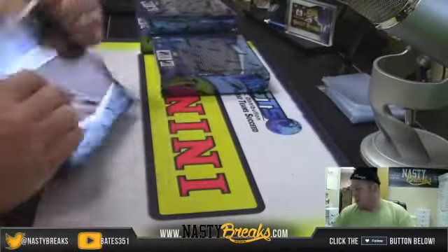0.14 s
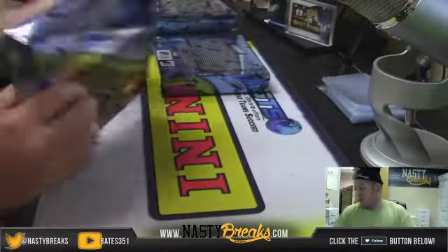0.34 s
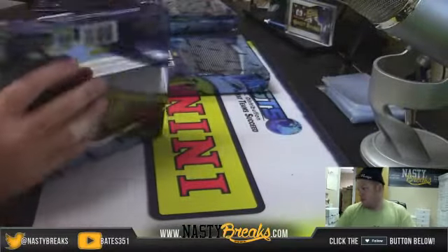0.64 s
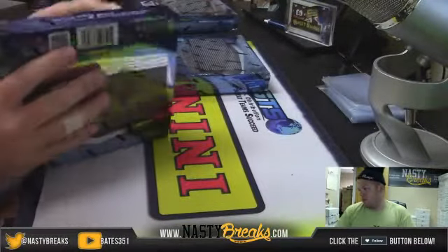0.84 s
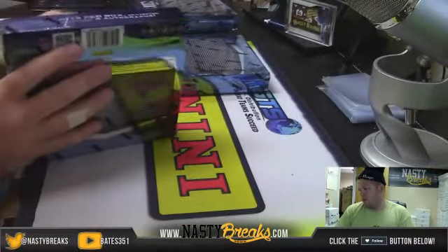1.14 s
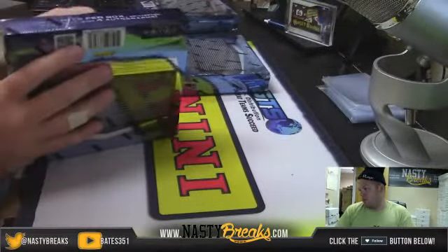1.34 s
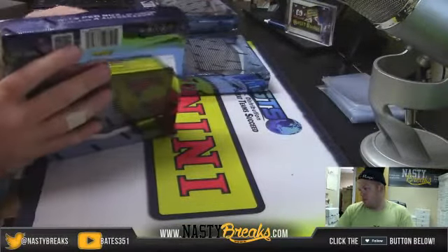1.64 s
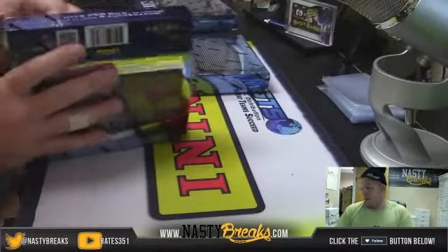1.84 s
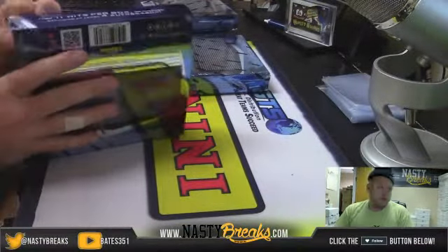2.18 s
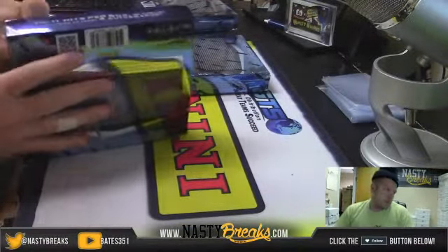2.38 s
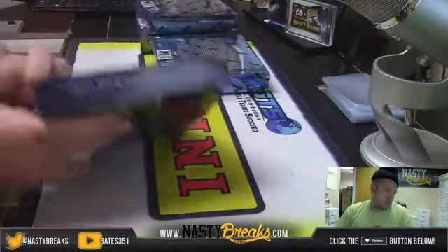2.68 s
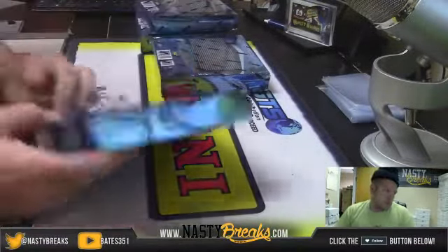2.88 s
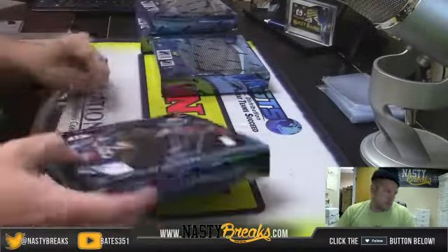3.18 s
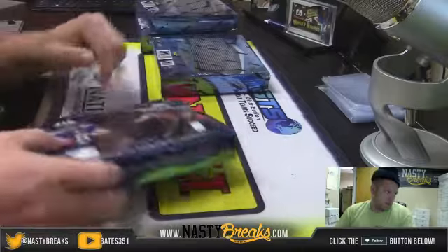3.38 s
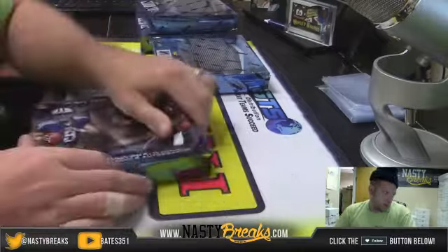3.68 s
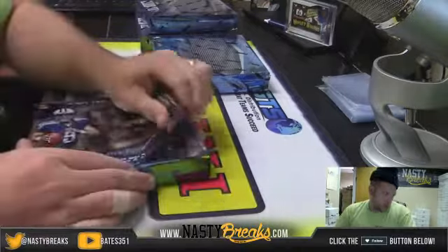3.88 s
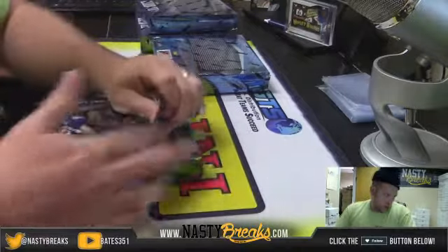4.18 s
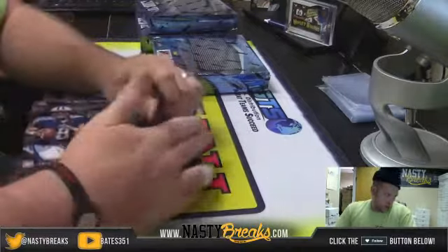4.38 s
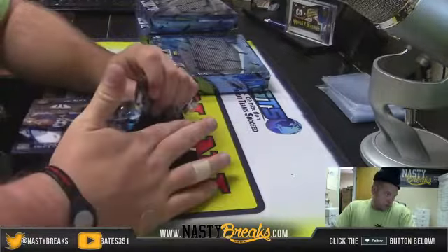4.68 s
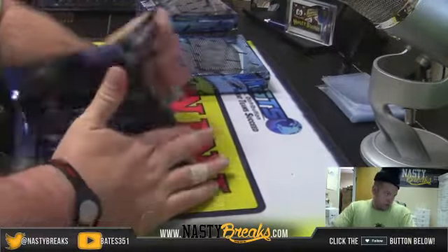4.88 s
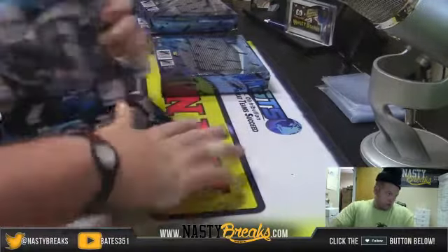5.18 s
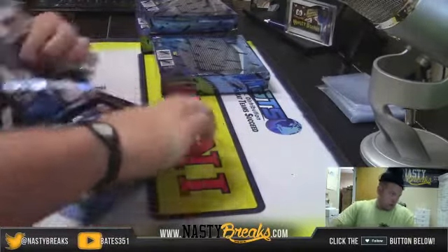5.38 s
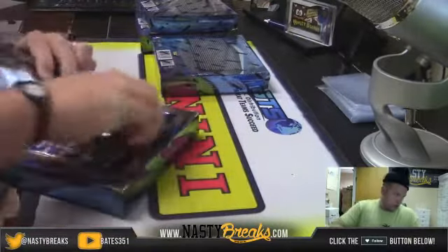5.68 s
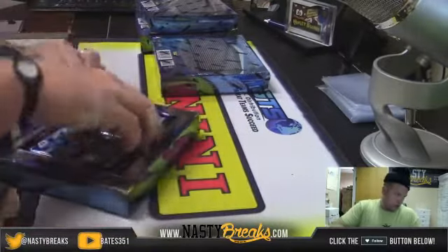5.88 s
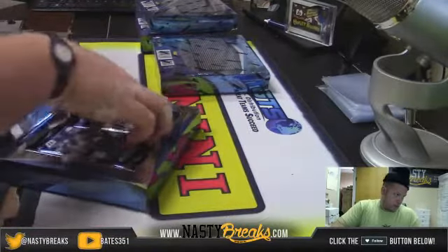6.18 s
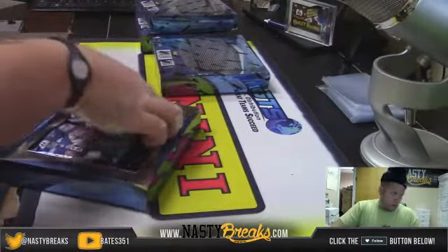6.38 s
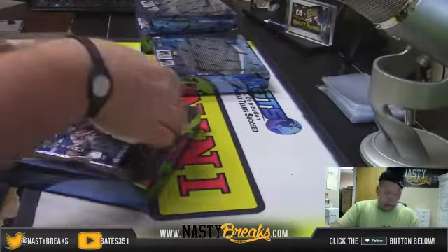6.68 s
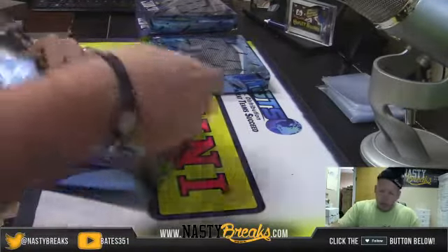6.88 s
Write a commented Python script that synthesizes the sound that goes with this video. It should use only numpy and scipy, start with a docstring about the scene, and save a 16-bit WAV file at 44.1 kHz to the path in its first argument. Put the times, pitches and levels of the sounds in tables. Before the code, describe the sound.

In a small room, hands slide and turn a film-wrapped cardboard box on a desk. Light knocks and crinkles lead to a hard thud just after two seconds, more sliding, then a very loud distorted slap near four and a half. Plastic then crackles and snaps densely to the end. The close microphone picks up desk rumble through its stand, over faint hum.

```python
"""At a desk in a small room, shrink-wrapped cardboard boxes are lifted, slid, opened and set down near a microphone.
Cardboard is made of ringing modes and shaped noise for knocks, and of random tiny slips for rubbing.
Plastic film swishes as shaped noise and crackles and snaps as short bursts with pitches of their own.
Landings ring the desk top and sway the microphone stand, over mains hum and hiss; the hardest blows clip."""
import sys
import numpy as np
from scipy import signal
from scipy.fft import rfft, irfft, next_fast_len
from scipy.io import wavfile
from scipy.ndimage import map_coordinates

SR = 44100
rng = np.random.default_rng(int(sys.argv[2]) if len(sys.argv) > 2 else 0)


def to_wav(s):
    """Save 16-bit WAV."""
    ch = np.atleast_2d(s).T  # columns
    pcm = np.round(np.clip(ch, -1, 1) * 32767)  # PCM
    wavfile.write(sys.argv[1], SR, pcm.astype(np.int16))


N = 310023  # length of the scene in samples

# The tone colour of cardboard. Each row: frequency in Hz, relative level in dB.
CARDBOARD_COLOUR = [(60, 4), (170, 6.5), (260, -1), (420, 2), (750, 0), (1000, -7), (1300, -4), (2000, -19),
                    (3500, -18), (8000, -37)]
# The tone colour of plastic film. Each row: frequency in Hz, relative level in dB.
FILM_COLOUR = [(500, -8), (1500, 8), (3300, 4.5), (5000, 2.5), (8000, 4), (10500, -2), (13000, 1.5),
               (16000, -5)]
# The tone colour of a stiff edge or sheet. Each row: frequency in Hz, relative level in dB.
EDGE_COLOUR = [(400, -11.5), (1500, 5), (3500, 2), (4800, 3), (5600, 3), (6500, 1), (8800, 5), (11000, -4),
               (13500, 2), (16000, -13)]
# The modes of the desk top. Each row: frequency in Hz, level in dB, time to fade by 60 dB in seconds.
DESK_MODES = [(65, -28, 0.18), (89, -2, 0.095), (111, 1, 0.24), (122.2, 0, 0.19), (166.5, -10, 0.17),
              (225.5, -8.5, 0.04), (293, -30.5, 0.074)]
LEAD_IN = 0.006  # seconds of quiet rise before a blow


def amp(db):
    """Turn decibels into a gain."""
    return 10 ** (np.asarray(db) / 20)


def unit(x):
    """Scale a sound to an rms of 1."""
    return x / np.sqrt(np.mean(x ** 2) + 1e-20)


def along(points, hz):
    """Read a table of (Hz, value) points at any frequency, along a logarithmic axis."""
    point_hz, value = np.transpose(points)
    return np.interp(np.log(hz + 1), np.log(point_hz + 1), value)


def curves(rows):
    """Join the rows into one curve of straight segments for each column after the time."""
    seconds, *columns = np.transpose(rows)
    return [np.interp(np.arange(N) / SR, seconds, column) for column in columns]


def wobble(rate):
    """Draw a smooth random curve through a given number of random points a second."""
    points = rng.standard_normal(int(N * rate / SR) + 4)
    return map_coordinates(points, [np.arange(N) * rate / SR])


def filtered(x, response):
    """Multiply the spectrum of a sound by a response that depends on frequency."""
    size = next_fast_len(len(x) + 8192)  # silence added so that the end does not wrap to the start
    spectrum = rfft(x, size) * response(np.fft.rfftfreq(size, 1 / SR))
    return irfft(spectrum, size)[:len(x)]


def coloured(x, colour):
    """Give a sound the tone colour in a table, at an rms of 1."""
    return unit(filtered(x, lambda hz: amp(along(colour, hz))))


def resonance(hz, centre, width):
    """The frequency response of one damped mode."""
    return 1j * hz * width / (centre ** 2 - hz ** 2 + 1j * hz * width)


def fade(t, t60):
    """A decay that loses 60 dB in t60 seconds."""
    return np.exp(-np.log(1000) * t / t60)


def struck(t, t60, lead_db):
    """The loudness of a contact: a short quiet rise, then the blow and its decay."""
    return np.where(t < LEAD_IN, amp(lead_db) * t / LEAD_IN, fade(np.abs(t - LEAD_IN), t60))


def add(track, s, sound):
    """Mix a sound into the track at s seconds."""
    start = max(round(s * SR), 0)
    track[start:start + len(sound)] += sound[:max(N - start, 0)]


def slips(rate, spread_db):
    """Stick and slip: random tiny impulses of very unequal size, about rate of them a second."""
    size = amp(spread_db * np.minimum(rng.exponential(size=N), 3))
    happens = rng.random(N) < rate / SR
    return happens * size * rng.choice([-1, 1], N)


def ringing(modes, t, hardness_db, pivot_hz, scatter_db):
    """Damped modes struck at new strengths each time; a harder contact favours the higher ones."""
    total = np.zeros(len(t))
    for hz, db, t60 in modes:
        strength_db = db + hardness_db * np.log2(hz / pivot_hz) + scatter_db * rng.standard_normal()
        total += amp(strength_db) * fade(t, t60) * np.sin(2 * np.pi * hz * t)
    return total


def background(hiss_db=-60):
    """Steady mains tones, gently wavering in level, lie over a quiet hiss of shaped noise."""
    # The hum. Each row: frequency in Hz, rms level in dB before the wavering.
    hum_tones = [(119.7, -43), (179.6, -71.5), (359.2, -69)]
    # The tone colour of the hiss. Each row: frequency in Hz, relative level in dB.
    hiss_colour = [(25, 19), (80, 29), (170, 43), (260, 5), (500, 14.5), (1200, -13.5), (4000, -42),
                   (9000, -19.5), (16000, -16.5)]
    t = np.arange(N) / SR
    hum = np.zeros(N)
    for hz, db in hum_tones:
        hum += amp(db) * np.sqrt(2) * np.sin(2 * np.pi * (hz * t + rng.random()))
    hiss = amp(hiss_db) * coloured(rng.standard_normal(N), hiss_colour)
    return hum * amp(1.4 * wobble(6.7)) + hiss


def room(x):
    """The small room answers with a short tail of noise whose fading time depends on frequency."""
    # How the room fades. Each row: frequency in Hz, time to fade by 60 dB in seconds.
    room_decay = [(100, 0.4), (600, 0.28), (3000, 0.31), (14000, 0.22)]
    hz, t, grains = signal.stft(rng.standard_normal(SR // 2), SR, nperseg=256)
    decay = np.exp(-np.log(1000) * t / along(room_decay, hz)[:, None])
    tail = signal.istft(grains * decay, SR, nperseg=256)[1]
    delay = round(0.0056 * SR)  # 5.6 ms before the answer begins
    return signal.fftconvolve(x, np.pad(tail / np.linalg.norm(tail), (delay, 0)))[:N]


def landings(stand_hz=30.64, stand_t60=0.52, rise=0.0076):
    """Weight landing or leaning on the desk rings its top and rocks the microphone stand."""
    # Each row: start in seconds, desk boom in dB, stand sway in dB, hardness in dB per octave.
    thumps = [(0.062, -32, -24, -6), (0.257, -8, -19.5, 4.5), (0.692, -30, -16.5, 7), (1.41, -37, -17, 0),
              (1.664, -19, -30.5, 6), (1.997, -23.5, -13, -4), (2.167, -8, -8.5, 10.5),
              (2.58, -40, -21.5, 0), (3.025, -26, -15.5, 15), (3.255, -8, -12, 6.5), (3.8, -49, -19.5, 0),
              (4.171, -32.5, -30, 13), (4.4622, -2, -6, -0.5), (4.4858, -4.5, -17, 17),
              (4.564, -19, -15.5, -1), (4.998, -38, -22.5, 0), (6.198, -30.5, -31.5, 3),
              (6.845, -6, -19, 10), (6.953, -5, -32, 2.5)]
    out, t = np.zeros(N), np.arange(SR) / SR
    sway = fade(t, stand_t60) * np.sin(2 * np.pi * stand_hz * t)
    soft_start = 1 - np.exp(-t / rise)
    for s, boom_db, sway_db, hardness_db in thumps:
        boom = ringing(DESK_MODES, t, hardness_db, pivot_hz=127, scatter_db=1.5)
        add(out, s, (amp(boom_db) * boom + amp(sway_db) * sway) * soft_start)
    return out


def trembling(rub_db, stand_hz=30.64, scuff_db=-15):
    """The stand trembles and the desk top scuffs, both stronger the harder the cardboard is rubbed."""
    mean_db, follows, lag = -34, 0.36, 0.037  # base level in dB, dB gained per dB of rubbing, delay in seconds
    noise = rng.standard_normal(N)
    tremble = unit(filtered(noise, lambda hz: resonance(hz, stand_hz, 16.4) ** 2))
    desk_ring = ringing(DESK_MODES, np.arange(SR) / SR, 8.1, pivot_hz=125, scatter_db=-1.5)
    scuff = unit(signal.fftconvolve(slips(rate=120, spread_db=6), desk_ring)[:N])
    push_db = np.interp(np.arange(N) - lag * SR, np.arange(N), rub_db - rub_db.mean())
    return amp(mean_db + follows * push_db) * (tremble + amp(scuff_db) * scuff)


def effort():
    """Film and cardboard levels in dB: each hand stroke speeds up, peaks and slows, over merely holding the box."""
    # Strokes that slide or turn a box. Each row: fastest moment in seconds, length in seconds,
    # film swish in dB, cardboard rub in dB.
    strokes = [(0.098, .17, -49.5, -46), (0.33, 0.44, -57, -46), (0.726, 0.2, -57.5, -45.5),
               (0.951, .2, -58.5, -58.5), (1.3, 0.11, -53.5, -49), (1.431, 0.15, -43.5, -44),
               (1.648, 0.075, -41, -39.5), (1.855, 0.92, -51.5, -49.5), (2.249, .16, -41.5, -41),
               (2.564, 0.45, -38, -42), (2.861, 0.083, -49, -39), (3.237, .15, -42.5, -42),
               (3.459, 0.26, -53.5, -47), (3.702, 0.47, -49, -52), (3.958, .26, -53, -46),
               (4.207, 0.39, -57, -58.5), (4.561, .12, -49, -38), (4.7, 0.12, -45.5, -44),
               (4.89, 0.44, -46, -48.5), (5.26, .34, -49.5, -42.5), (5.54, 0.25, -51, -53),
               (5.693, 0.12, -52.5, -44.5), (5.968, .32, -51, -43.5), (6.16, .15, -46, -40),
               (6.339, .2, -57, -52.5), (6.529, .19, -45, -39), (6.886, .07, -43.5, -45),
               (7.005, 0.098, -60.5, -42)]
    rise_share = 0.46  # part of a stroke spent speeding up
    end_drop_db, roundness = 8.5, 1.19  # level lost at the ends of a stroke, roundness of its top
    hold_film_db, hold_card_db = -74.5, -73.5  # fingers that merely hold the box
    t = np.arange(N) / SR
    film = np.full(N, amp(hold_film_db) ** 2)
    card = np.full(N, amp(hold_card_db) ** 2)
    for s, length, film_db, card_db in strokes:
        near = slice(*np.searchsorted(t, [s - 2 * length, s + 2 * length]))
        before, after = (s - t[near]) / rise_share, (t[near] - s) / (1 - rise_share)
        away = np.maximum(before, after) / length  # 0 at the peak, 1 at either end
        power = amp(-end_drop_db * away ** roundness) ** 2
        film[near] += amp(film_db) ** 2 * power
        card[near] += amp(card_db) ** 2 * power
    return 10 * np.log10(film), 10 * np.log10(card)


def crackle(rate=450, pitch_hz=6500, pitch_spread=0.55, spread_db=7.0):
    """Tiny creases pop at random, swelling and thinning out, each a short ragged burst around its own pitch."""
    count = round(rate * N / SR)
    when, luck = rng.random((2, count, 1))
    hz = np.clip(pitch_hz * np.exp(pitch_spread * rng.standard_normal((count, 1))), 1500, 15000)
    size = amp(spread_db * np.minimum(-np.log(1 - luck), 3)) * np.sqrt(hz)
    k = np.arange(SR // 200)  # the samples of one pop
    drift = np.cumsum(rng.standard_normal((count, len(k))), axis=1) * np.sqrt(2 * hz / SR)  # no clean tone
    swell = k / (0.0006 * SR)  # each pop peaks after 0.6 ms
    pops = size * swell * np.exp(-swell) * np.sin(2 * np.pi * hz * k / SR + drift)
    at = (when * N).astype(int) + k
    track = np.bincount(at.ravel(), pops.ravel(), N)[:N]
    return coloured(track * amp(3.15 * wobble(25)), FILM_COLOUR)


def rubbing(film_db, card_db, crumple):
    """Cardboard drags in tiny slips; the film swishes and crackles."""
    card = coloured(slips(rate=1500, spread_db=5.0), CARDBOARD_COLOUR)
    film = coloured(rng.standard_normal(N), FILM_COLOUR) + 1.135 * crumple * crackle()
    # crumpled film catches and lets go; taut film slides more evenly
    pressure = amp(2.6 * np.minimum(crumple, 1) * wobble(40))
    return pressure * (amp(card_db + 2.56 * wobble(30)) * card + amp(film_db) * film)


def scrapes(width_share=0.27, body_db=-5):
    """A scrape or slap swells and fades; its slips ring the patch under the finger, and the box behind it."""
    # Fingers and box edges. Each row: middle in seconds, half of the full span in seconds,
    # level in dB, resonance of the patch in Hz.
    contacts = [(0.1, 0.046, -33.5, 796), (0.693, 0.009, -19, 1526), (1.426, .14, -42, 448),
                (1.62, .09, -37.5, 665), (1.665, 0.011, -17.5, 2210), (2.176, 0.0087, -6, 826),
                (3.016, .03, -31, 600), (3.25, .07, -33, 1000), (3.96, .05, -35, 1200),
                (4.456, .003, 6.5, 5580), (4.468, .012, -2.5, 796), (4.495, .05, -25, 870),
                (4.569, .025, -21.5, 1030), (5.35, 0.032, -29.5, 1140), (5.541, 0.077, -35, 1240),
                (5.701, .055, -34, 1260), (5.921, .05, -29.5, 1140), (6.04, .024, -29, 1150),
                (6.158, .08, -29.5, 1183), (6.524, 0.052, -27, 7160), (6.857, .016, -26.5, 395),
                (6.963, .02, -19, 4000)]
    out = np.zeros(N)
    for s, length, db, patch_hz in contacts:
        swell = np.hanning(round(2 * length * SR)) ** 2
        drag = slips(rate=2500, spread_db=7.0)[:len(swell)] + rng.standard_normal(len(swell)) / 10
        patch = unit(filtered(drag, lambda hz: resonance(hz, patch_hz, width_share * patch_hz)))
        body = amp(body_db) * min(1, 1000 / patch_hz) * coloured(drag, CARDBOARD_COLOUR)
        add(out, s - length, amp(db) * swell * (patch + body) / 2)
    return out


def faint_snaps(crackle_db):
    """Rows of small snaps at random times: harder crumpling makes them more frequent and stronger."""
    count, over_crackle_db, scatter_db = 60, 14, 4.5
    typical_hz, low_db = 5230, -6  # usual pitch, and level of the low backing
    strain = np.cumsum(amp(crackle_db))
    when, size, pitch = rng.random((count, 3)).T
    at = np.searchsorted(strain, when * strain[-1])
    rows = []
    for i, a, b in zip(at, 2 * size - 1, 2 * pitch - 1):
        level_db = crackle_db[i] + over_crackle_db + scatter_db * a
        rows.append((i / SR, level_db, typical_hz * 2 ** b, low_db))  # up to an octave either way
    return rows


def snaps(faint_rows, snap_t60=0.0076, flutter_db=-19, flutter_t60=0.042, broad_db=-22, lead_db=-20, crease_count=3):
    """A crease of film strains and buckles: a sharp tick in its own resonances, then smaller creases follow."""
    # The loud snaps. Each row: time in seconds, level in dB, pitch in Hz, low backing (about 1-3 kHz) in dB.
    loud_rows = [(0.0654, -19, 8000, -36), (0.7382, -24.5, 2930, -42), (1.1827, -29, 10280, -36),
                 (1.8971, -18, 7500, -6), (3.1712, -29, 3950, -4), (3.7798, -25, 11600, -21.5),
                 (3.79, -24, 4110, -29), (3.9938, -28.5, 3320, 7), (4.5221, -17, 2740, -8),
                 (5.3742, -19, 5700, -14), (5.4417, -19, 6900, -18), (5.4614, -24, 2000, 8),
                 (5.5258, -21.5, 6000, 3), (5.598, -25.5, 3750, 7.5), (5.6705, -23.5, 3820, 10),
                 (5.7164, -26, 2400, 3), (5.8326, -15.5, 5200, -4), (5.9045, -16, 4740, -15),
                 (5.9122, -22, 4630, -14), (5.9349, -14, 2290, -6), (5.9673, -17, 5900, -3),
                 (6.0327, -25, 8060, 0), (6.0691, -19.5, 4090, 6), (6.0854, -22, 3730, 3),
                 (6.1245, -12, 3480, -30.5), (6.1394, -19, 8000, -20), (6.1524, -23, 4700, -18),
                 (6.2851, -25.5, 8300, -25), (6.3689, -26.5, 5310, -36), (6.4497, -22.5, 8200, 5.5),
                 (6.4792, -13, 2850, -21), (6.4914, -19, 2680, -15), (6.5106, -18.5, 7760, -12),
                 (6.552, -13.5, 2340, -0.5), (6.5979, -12, 4800, -2), (6.6144, -20, 2050, 3),
                 (6.6784, -13.5, 2210, -9), (6.7845, -16, 3530, 3.5), (6.9666, -9.5, 3170, -30.5),
                 (6.992, -21.5, 6860, 4.5)]
    out, t = np.zeros(N), np.arange(SR // 12) / SR
    for s, db, pitch_hz, low_db in list(loud_rows) + faint_rows:
        buckle = rng.standard_normal(len(t)) * struck(t, snap_t60, lead_db)
        neighbour_delay = round(rng.uniform(0.00091, 0.005) * SR)
        buckle += amp(-9.0) * np.roll(buckle, neighbour_delay)  # the neighbouring crease gives way too
        small_creases = unit(slips(rate=1500, spread_db=13.5)[:len(t)])
        flutter = amp(flutter_db) * small_creases * struck(t, flutter_t60, lead_db)
        facets = np.append(pitch_hz, 6000 * np.exp(0.5 * rng.standard_normal(size=crease_count)))

        def film_response(hz):
            """Facets of the crease ring over a low backing and the broad sound of the sheet."""
            response = amp(low_db) * np.abs(resonance(hz, 1120, 1400)) ** 2
            response = response + amp(broad_db + along(EDGE_COLOUR, hz))
            for k, centre in enumerate(facets):
                share = 0.5 if k else 1  # the first facet leads
                response += share * np.sqrt(7000 / centre) * np.abs(resonance(hz, centre, centre / 3)) ** 2
            return response

        add(out, s - LEAD_IN, amp(db) * filtered(buckle + flutter, film_response))
    return out


def knocks(crack_t60=0.015, rattle_db=-17, rattle_t60=0.068, ring_db=-10, panel_db=-10, lead_db=-21):
    """A blow cracks a stiff edge, rings the hollow box, and briefly shuffles its packed contents."""
    # Each row: time in seconds, knock in dB, edge crack in dB, hardness in dB per octave.
    blows = [(0.062, -13.5, -13.5, 0.5), (0.193, -32, -37, 1), (0.258, -17.5, -38, 2),
             (0.334, -23.5, -40, -1.5), (0.395, -20.5, -53, -3), (0.552, -32.5, -42.5, 6.5),
             (0.654, -22.5, -40, 0), (0.691, -14.5, -19, -1.5), (0.816, -24.5, -29.5, -1),
             (1.406, -25, -24, -5.5), (1.464, -33, -22, -7), (1.634, -26, -16, -3.5),
             (1.661, -6, -19, -1.5), (1.779, -24.5, -38, 4), (2.061, -24.5, -26, -3), (2.167, 5, -4, -3),
             (2.176, -7.5, -20, -8.5), (2.312, -14, -40, -1), (2.829, -23.5, -52, 1),
             (2.905, -26, -24.5, 3.5), (2.998, -18, -45, -4), (3.21, -18, -29, 2), (3.287, -19.5, -34, 0),
             (3.628, -25, -40, -1.5), (3.804, -22, -37, -1.5), (4.455, -10, -15, 8),
             (4.457, 11, -11.5, 1.5), (4.463, 5, -11.5, -0.5), (4.476, -1, -40.5, -7),
             (4.563, -19.5, -37, -3.5), (4.949, -22, -39, 3), (5.104, -29, -39.5, 8),
             (5.45, -30.5, -21.5, 3.5), (6.194, -15, -21, 2.5), (6.843, -15, -23.5, 2),
             (6.95, -14.5, -42, 4.5)]
    # The hollow box. Each row: frequency in Hz, level in dB, time to fade by 60 dB in seconds.
    box_modes = [(413, -8.5, 0.057), (474.4, -3.5, 0.037), (564, -2, 0.035), (792.6, -7, 0.04),
                 (861, -4, 0.024), (1043, -14.5, 0.076), (1126, -4.5, 0.029), (1326, -0.5, 0.018),
                 (1620, -4, 0.016), (1768, -8.5, 0.029), (1964, -10, 0.035), (2287, -13, 0.041),
                 (2880, -24.5, 0.019), (3404, -19, 0.051)]
    panel_t60, rise = 0.073, 0.00094  # seconds
    out, t = np.zeros(N), np.arange(SR // 3) / SR
    for s, knock_db, crack_db, hardness_db in blows:
        walls, edge = rng.standard_normal((2, len(t)))
        ring = amp(ring_db) * ringing(box_modes, t, hardness_db, pivot_hz=800, scatter_db=1.5)
        # a harder blow brightens the panels
        tilted = [(hz, db + hardness_db * np.log2(hz / 800)) for hz, db in CARDBOARD_COLOUR]
        panels = amp(panel_db) * coloured(walls, tilted) * fade(t, panel_t60)
        add(out, s, amp(knock_db) * (ring + panels) * (1 - np.exp(-t / rise)))
        crack = coloured(edge, EDGE_COLOUR) * struck(t, crack_t60, lead_db)
        contents = coloured(slips(rate=4000, spread_db=5.5)[:len(t)], EDGE_COLOUR)
        shuffle = amp(rattle_db) * contents * struck(t, rattle_t60, lead_db)
        add(out, s - LEAD_IN, amp(crack_db) * (crack + shuffle))
    return out


def scene():
    """Boxes and film in the room, with the desk felt through the stand; hand effort drives rubbing and faint snaps."""
    # How crumpled the moving film is. Each row: time in seconds, relative level of crackle over swish in dB.
    crumple_rows = [(0, 5.5), (1.6, 0.5), (2.4, -1.5), (2.8, -7.5), (3.2, 1), (3.8, -3), (4.3, 3.5),
                    (4.9, -4), (5.4, -2.5), (5.9, 5), (7.03, 7)]
    film_db, card_db = effort()
    crumple_db, = curves(crumple_rows)
    film_sounds = snaps(faint_snaps(film_db + crumple_db))
    handling = knocks() + film_sounds + scrapes() + rubbing(film_db, card_db, amp(crumple_db))
    desk = landings() + trembling(card_db)
    return (handling + amp(-17.5) * room(handling) + desk + background())[None]


def record(dry):
    """The input clips at full scale, then everything from 16150 Hz up is removed."""
    clipped = np.clip(dry[0], -1, 1)
    return filtered(clipped, lambda hz: hz < 16150)[None]


dry = scene()
out = record(dry)
to_wav(out)
```